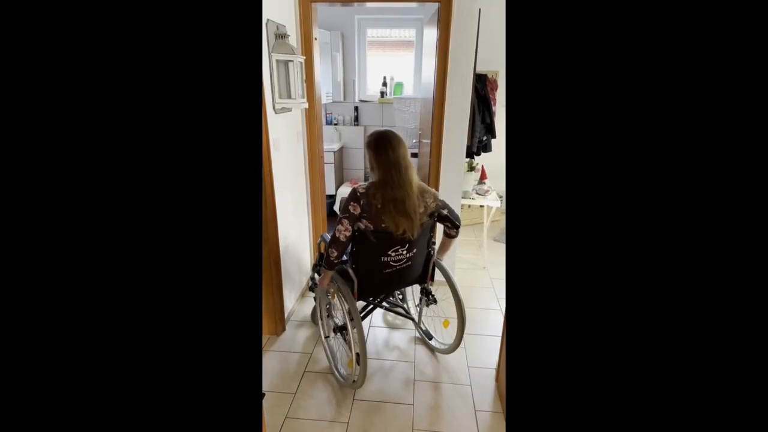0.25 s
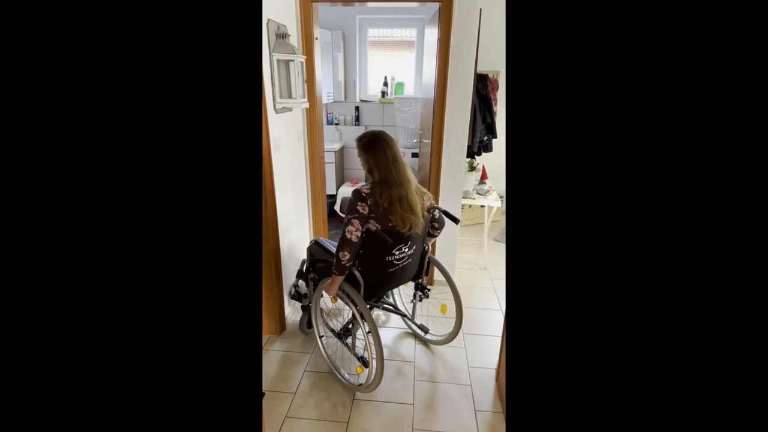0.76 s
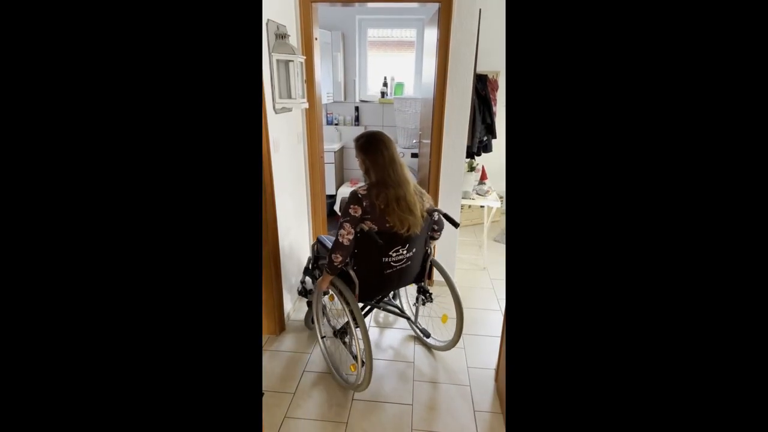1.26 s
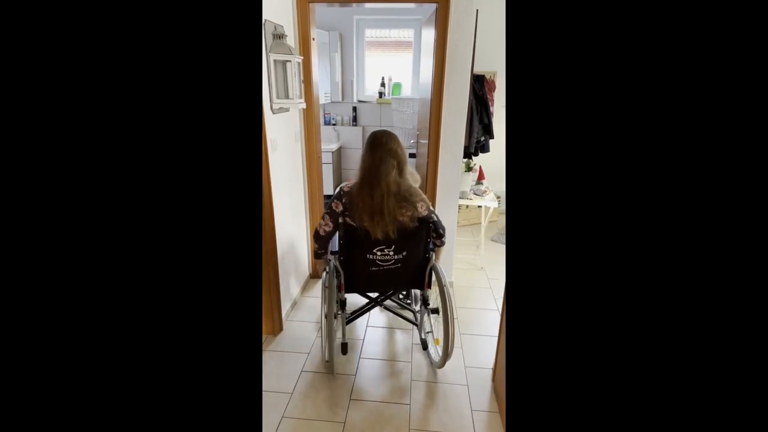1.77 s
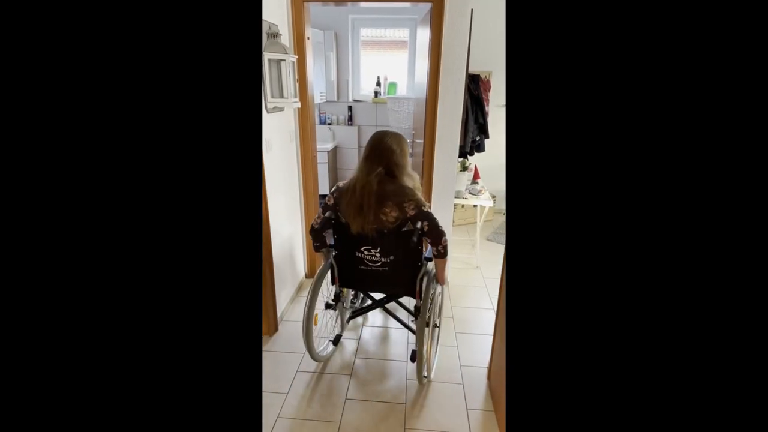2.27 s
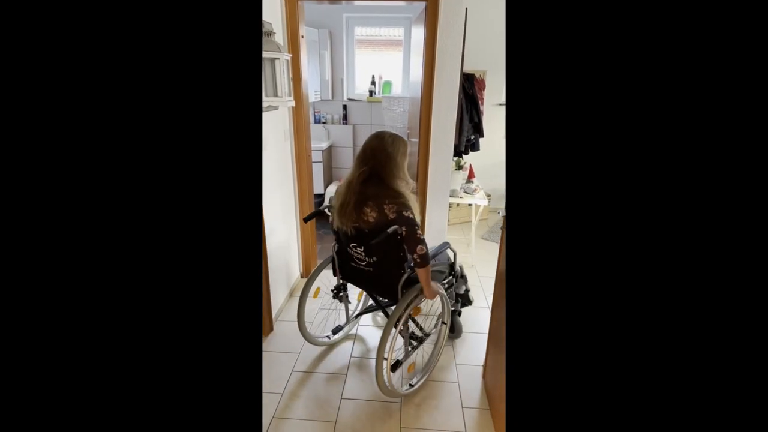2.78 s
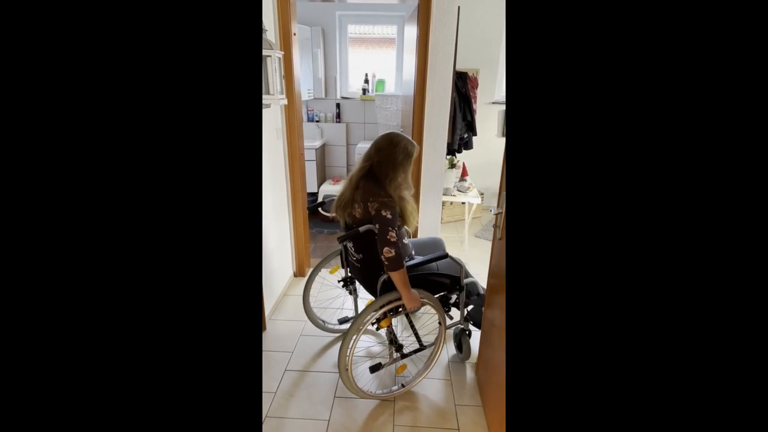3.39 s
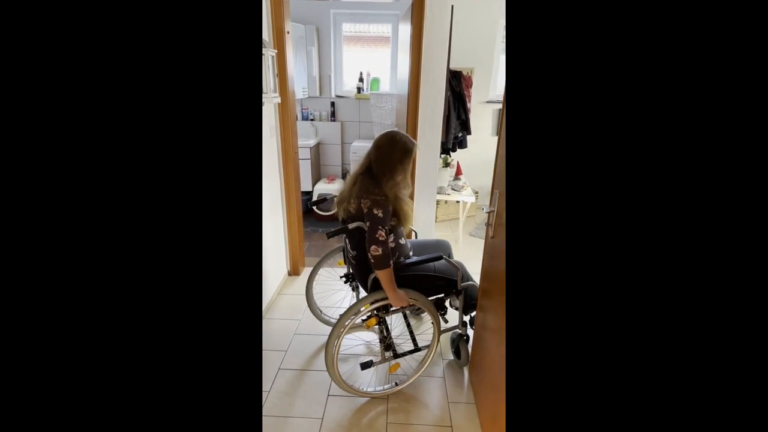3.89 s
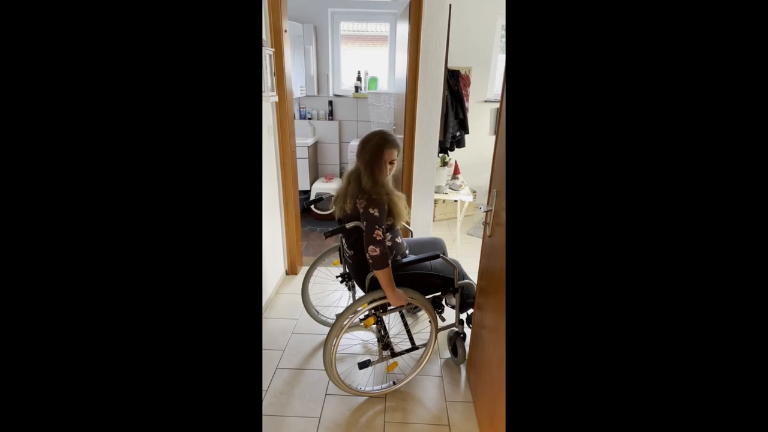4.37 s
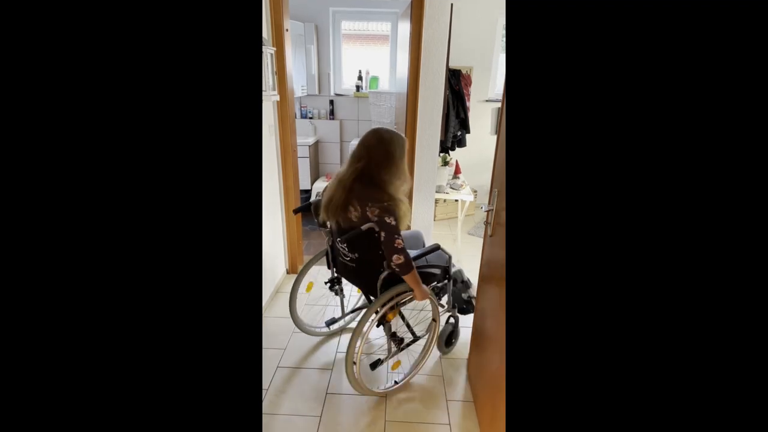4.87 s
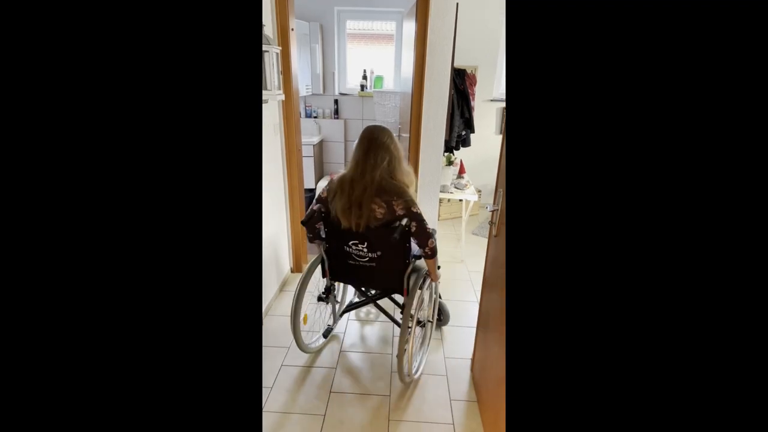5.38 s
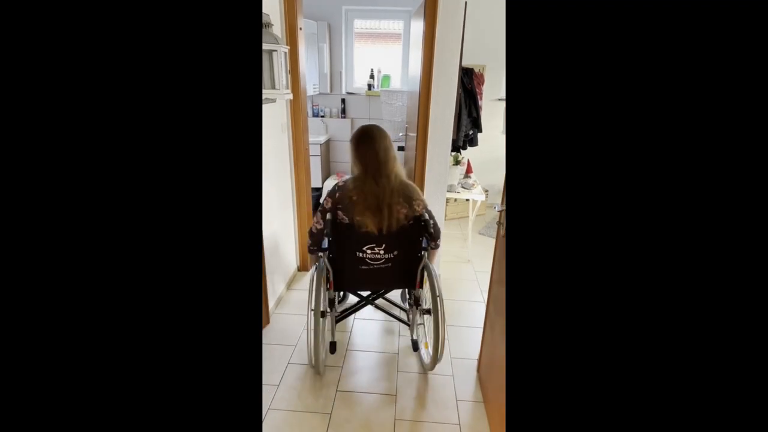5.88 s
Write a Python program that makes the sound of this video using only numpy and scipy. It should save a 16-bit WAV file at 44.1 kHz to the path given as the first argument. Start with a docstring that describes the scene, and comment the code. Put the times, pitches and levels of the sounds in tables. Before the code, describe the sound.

A wheelchair turns on a tiled floor, its tyres scrubbing in short pushes with clicks, rattles and one dull knock against a door.

```python
"""In a narrow tiled doorway off a hard hallway, a wheelchair turns to and fro a few metres from a phone. Stick-
slip friction makes the tyres scrub in short pushes, squeak once and ring the frame and hand rims. Loose joints
click, a palm slides on a rim, and a footrest strikes the door and bounces. The floor rumbles under the rolling
weight and thuds at the tile joints. The hallway reverberates, and a phase spread between the stereo channels
widens the treble."""
import sys
import numpy as np
from scipy import signal
from scipy.fft import rfft, irfft
from scipy.io import wavfile
from scipy.ndimage import uniform_filter1d

SR = 44100
rng = np.random.default_rng(int(sys.argv[2]) if len(sys.argv) > 2 else 0)


def waveform_to_disk(signal):
    """Save audio, clipped to [-1, 1], as 16-bit WAV at the path in sys.argv[1]."""
    frames = np.transpose(np.atleast_2d(signal))
    scaled = np.clip(frames, -1, 1) * 32767
    samples = np.round(scaled).astype(np.int16)
    wavfile.write(sys.argv[1], SR, samples)


N = 270935

# Pushes on the wheels: start_s, hold_s, level_db, swell_db, fade_db_per_s,
# dull_share_db, hiss_share_db, frame_share_db, rim_share_db, thump_db
WHEEL_PUSHES = [(0.0, 0.043, -61, -4.5, 100, -4.5, -12.5, -14, -24, -83),
                (0.055, 0.069, -60, -4, 90, 3.5, -8, -20, -22, -61),
                (0.16, 0.06, -59, 9.5, 400, -17, -7.5, -13, -23, -75),
                (0.22, 0.024, -47.5, -3.5, 183, 2.5, -11.5, -12, -15, -52.5),
                (0.344, 0.11, -74, -3, 150, 1.5, -9, -22, -8, -77),
                (0.617, .02, -50.5, -9, 200, -15, -9, -15, -19, -80),
                (0.657, 0.065, -47.5, 2.5, 300, -8.5, -8, -4, -8, -56),
                (0.723, 0.017, -49.5, -1.5, 106, -4, -12, -6, -18, -60),
                (0.859, 0.036, -49.5, 6.5, 200, -18, -6.5, -6.5, -11, -80),
                (0.925, 0.045, -46, 3, 217, -18, -10, -0.5, -18, -74.5),
                (1.092, 0.12, -43.5, 1, 200, -13, -12.5, -5, -23, -66.5),
                (1.215, 0.051, -42, -1, 159, -13.5, -8.5, -4, -32, -71),
                (1.375, 0.091, -61.5, -4.5, 150, 0, -10.5, -10, -29, -65.5),
                (1.483, 0.041, -61, 10, 400, -14, -15, -6, -32, -75),
                (1.536, 0.1, -44.5, -3, 130, -9, -6.5, -5.5, -32, -54),
                (1.776, 0.094, -47, 7, 150, -11, -7.5, -5, -32, -58.5),
                (1.932, 0.029, -44.5, 0, 148, -9.5, -6.5, -5, -33, -54),
                (2.002, .01, -46, 0, 120, -5, -7.5, -9.5, -35, -65),
                (2.09, .02, -49.5, -3.5, 170, -4, -5, -7.5, -33, -61.5),
                (2.182, 0.031, -52.5, -2, 89, -2.5, -15, -30, -31, -57),
                (2.466, 0.078, -62, -1, 113, 0.5, -14, -32, -27, -58.5),
                (2.65, 0.098, -73.5, 6, 98, -15, -6.5, -28, -9, -85),
                (2.751, 0.065, -65.5, -8, 100, 8, -23, -27, -9, -64),
                (2.839, 0.016, -60.5, 3.5, 94, -1, -25, -29, -23, -65),
                (2.99, 0.087, -69.5, 4.5, 87, -5, -17, -16, -18, -64.5),
                (3.429, 0.087, -69.5, -1, 197, -5.5, -7.5, -17, -16, -71.5),
                (3.54, 0.014, -55, -8, 138, -0.5, -9.5, -31, -8, -64.5),
                (3.822, 0.015, -51, 2.5, 149, -2.5, -14, -25, -14, -76),
                (3.998, 0.0076, -69, -4.5, 254, 11.5, -30, -14, -17, -80),
                (4.423, 0.1, -50, -1, 197, -1, -10.5, -24, -12, -66),
                (4.511, 0.04, -46.5, -3.5, 105, -0.5, -10.5, -22, -6, -58.5),
                (4.608, 0.071, -48.5, -1, 130, -3, -8.5, -12, -8, -64),
                (4.817, 0.13, -67, 6.5, 150, -3, -10.5, -10, -17, -71.5),
                (4.985, 0.054, -58, 6, 128, -3.5, -6.5, -24, -6, -67.5),
                (5.134, 0.077, -46, -3, 181, -6, -14, -8.5, -18, -61.5),
                (5.397, 0.073, -49, 2, 120, -4, -7, -18, 0, -66.5),
                (5.499, 0.099, -52, -1, 200, 0.5, -16, -25, -14, -68),
                (5.234, 0.013, -50, -1.5, 248, -5, -8, -7, -18, -65),
                (5.613, 0.023, -47.5, -2.5, 170, 0, -16, -4.5, -26, -59.5),
                (5.708, 0.096, -58, 1, 150, -2.5, -19.5, -9, -27, -57),
                (5.796, .01, -51, 0.5, 94, -4.5, -10, -15, -26, -54),
                (5.977, .1, -47, 0, 290, -4.5, -10, -6.5, -35, -56.5)]
# Wheels dropping into the joints between tiles: start_s, level_db, pitch_hz
TILE_BUMPS = [(0.058, -45, 230), (0.22, -51, 267), (0.658, -35.5, 232.4), (1.369, -40.5, 92.4),
              (1.544, -39, 217.5), (2.199, -44.5, 341), (2.481, -50, 268), (3.323, -47, 95),
              (4.699, -40, 232), (5.567, -38, 171)]


def undb(db):
    """Decibels as an amplitude ratio."""
    return 10 ** (np.asarray(db) / 20)


def across(table):
    """Rows of (frequency_hz, value) interpolated to every spectral bin on a log axis."""
    hz, value = np.transpose(table)
    return np.interp(np.log(np.fft.rfftfreq(N, 1 / SR) + 1), np.log(hz + 1), value)


def coloured(x, spectrum):
    """Spectral shaping by rows of (frequency_hz, gain_db), rolled off beyond both ends; rms 1."""
    closed = [(spectrum[0][0] / 2, -70), *spectrum, (spectrum[-1][0] * 2, -70)]
    y = irfft(rfft(x) * undb(across(closed)), N)
    return y / np.std(y)


def curve(rows):
    """Rows of (time_s, value) interpolated to every sample."""
    return np.interp(np.arange(N) / SR, *np.transpose(rows))


def walk(rate_hz):
    """Slow random modulation: held levels smoothed twice, with a spread near 1."""
    k = int(SR / rate_hz)
    steps = np.repeat(rng.standard_normal(N // k + 1), k)
    return 1.32 * uniform_filter1d(uniform_filter1d(steps, k), k)[:N]


def ring(hz, t60, seconds):
    """Free vibration of one damped mode."""
    t = np.arange(int(seconds * SR)) / SR
    return np.sin(2 * np.pi * hz * t) * 1000. ** (-t / t60)


def add(out, start_s, sound):
    """Superpose a sound on out."""
    i = int(start_s * SR)
    out[i:i + len(sound)] += sound[:N - i]


def swells(start, hold, db, swell_db, fade_db_per_s, attack_s):
    """Incoherent addition: envelopes that rise, swell over a hold and fade are summed in power."""
    grid = np.arange(0, N + 32, 32)
    t = grid[:, None] / SR - start
    held = np.clip(t / np.maximum(hold, .001), 0, 1)
    after = np.maximum(t - hold, 0)
    gain = np.clip(1 + t / attack_s, 0, 1) * undb(db + swell_db * held - fade_db_per_s * after)
    return np.interp(np.arange(N), grid, np.sqrt(np.sum(gain ** 2, axis=1)))


def background():
    """Stationary noise: a faint hush, strongest in the bass."""
    # frequency_hz, gain_db
    spectrum = [(100, 8), (300, -4), (1000, -15.5), (3000, -18), (8000, -23), (12000, -62), (16000, -7.5)]
    return undb(-75) * coloured(rng.standard_normal(N), spectrum)


def floor():
    """Structure-borne sound: rolling weight shakes the floor, which thumps at each push and bump."""
    rolling = [(0, -61), (.2, -70), (.52, -62), (.61, -77), (.67, -56), (.85, -57), (1.04, -72.5),
               (1.32, -75), (1.39, -61), (1.55, -66), (1.95, -61.5), (2.18, -71), (2.42, -57.5), (2.8, -82),
               (2.86, -60), (3.27, -72.5), (3.33, -60.5), (3.4, -63), (3.58, -57), (3.8, -66.5),
               (4.25, -64), (4.35, -73), (4.51, -65), (4.8, -60.5), (5.03, -68), (5.43, -72), (5.6, -63.5),
               (6.05, -63), (6.14, -77)]  # strength of the rumble: time_s, level_db
    rumble_spectrum = [(32, -31.5), (42, 5.5), (52, -1.5), (62, 1.5), (85, -10), (115, -13)]  # deep floor vibration: frequency_hz, gain_db
    thump_spectrum = [(90, -4.5), (130, -6), (210, 1), (320, -5.5), (480, -10.5)]  # the floor's response to a jolt: frequency_hz, gain_db
    push_start, push_hold, *_, push_db = np.transpose(WHEEL_PUSHES)
    bump_start, bump_db, _ = np.transpose(TILE_BUMPS)
    start = np.r_[push_start, bump_start] + 0.011  # the thump peaks just after its cause
    hold = np.r_[push_hold, np.full(len(bump_start), 0.01)]
    db = np.r_[push_db, bump_db - 22]
    jolts = swells(start, hold, db, swell_db=0, fade_db_per_s=98.5, attack_s=0.022)
    rumble = undb(curve(rolling)) * coloured(rng.standard_normal(N), rumble_spectrum)
    thump = jolts * undb(0.5 * walk(33)) * coloured(rng.standard_normal(N), thump_spectrum)
    return rumble + thump


def bumps():
    """Impact excitation: at a tile joint, floor and tyre thud together in two damped modes."""
    out = np.zeros(N)
    for start, db, hz in TILE_BUMPS:
        add(out, start, undb(db) * (0.37 * ring(hz, 0.21, .3) + 0.15 * ring(1.8 * hz, 0.18, .3)))
    return out


def palm():
    """Sliding friction: skin on the metal rim gives a smooth, fine hiss."""
    slide = [(2.2, -80.5), (2.4, -64.5), (2.55, -68), (2.7, -93), (3.0, -69.5), (3.25, -76.5), (3.4, -88)]  # strength of the rubbing: time_s, level_db
    spectrum = [(8500, -8), (10300, -2.5), (11500, -5.5), (13500, -12), (15800, 3)]  # skin on metal: frequency_hz, gain_db
    return undb(curve(slide) + 0.75 * walk(12)) * coloured(rng.standard_normal(N), spectrum)


def door_knock():
    """Modal response: the struck door rings and rattles; a softer contact excites fewer high modes."""
    blows = [(3.824, -33, 1500), (3.838, -33.5, 896), (3.86, -34, 380), (3.9, -33, 150), (3.975, -32, 116)]  # the footrest lands, bounces and leans: start_s, level_db, cutoff_hz
    modes = [(55.1, -2.5, 0.46), (84.1, -9.5, 1.), (93.4, -3.5, 0.61), (131, -10, 0.13), (204.2, -2, 0.38),
             (262, 1.5, 0.26), (322, 6.5, 0.13), (468, -0.5, 0.12), (637, -18, 0.19), (752, -3, 0.15),
             (998, -18, 0.14), (1140, -27, .1), (1400, -25, .1)]  # resonances of the door leaf: frequency_hz, level_db, t60_s
    out = np.zeros(N)
    t = np.arange(SR // 2) / SR
    press = np.linspace(0, 1, SR // 200)  # the rubber buffer yields for 5 ms
    for start, db, cutoff_hz in blows:
        strikes = undb(2.5 * rng.standard_normal(len(modes)))
        leaf = sum(strike * undb(mode_db) / (1 + (hz / cutoff_hz) ** 2) * ring(hz, t60, .5)
                   for strike, (hz, mode_db, t60) in zip(strikes, modes))
        leaf[:len(press)] *= press
        band = signal.butter(2, [100, 100 + cutoff_hz], "band", fs=SR, output="sos")
        noise = signal.sosfilt(band, rng.standard_normal(len(t)))
        rattle = 0.53 * noise / np.std(noise) * 1000. ** (-t / 0.23)
        add(out, start, undb(db - 6.5) * (leaf + rattle))
    return out


def joint_clicks():
    """Impact transients: play in the joints, and once the rebounding footrest, gives a hollow ring, a bright
    ring and a sharp crack."""
    # Joints and bolts striking, plus the footrest's small rebound off the door at 4.0 s: start_s, level_db,
    # hollow_hz, bright_hz, bright_share_db
    impacts = [(0.058, -42, 528, 2380, -1), (0.22, -40, 1050, 2220, 2), (0.274, -35, 750, 1850, -3.5),
               (0.616, -49, 1450, 3150, -8), (0.657, -42, 660, 3460, -1), (0.707, -40, 1670, 3720, 12),
               (1.089, -47, 1090, 3380, 4), (1.209, -27, 1590, 1910, -5), (1.537, -35, 990, 3070, 0.5),
               (1.776, -58, 1000, 3580, -10), (1.813, -37, 1120, 3250, 4), (1.927, -43, 1100, 3210, 4),
               (1.999, -42, 990, 3640, -7), (2.087, -37, 436, 3630, -4), (2.18, -46, 1020, 1860, 4),
               (2.204, -41, 1060, 2330, 6), (2.473, -43, 450, 3280, -26), (2.53, -40, 1050, 2400, -9),
               (2.756, -35.5, 540, 1830, -27), (2.854, -38, 1180, 2190, 0), (3.206, -53, 477, 4120, -4),
               (3.436, -59, 940, 4350, 3), (3.515, -42.5, 730, 2050, -19), (3.538, -42, 1110, 1860, 1),
               (3.998, -49, 579, 2170, -19), (4.421, -51, 665, 5320, 7), (4.441, -33, 605, 2170, -3.5),
               (4.507, -19.5, 1174, 2220, -6.5), (4.519, -33.5, 1050, 2890, 9.5),
               (4.617, -38, 650, 2850, -11), (4.672, -32.5, 660, 3000, -3.5),
               (4.983, -45.5, 1510, 2230, -5), (5.134, -34, 820, 3350, -7), (5.207, -40.5, 885, 2880, 1),
               (5.398, -54, 910, 5840, -8), (5.614, -31.5, 760, 2100, 1.5), (5.729, -43.5, 1110, 1880, -2),
               (5.799, -42.5, 990, 1960, 0), (5.976, -40, 1060, 2260, -5), (6.128, -28.5, 444, 1940, -18)]
    out = np.zeros(N)
    length_s = .06
    t = np.arange(int(length_s * SR)) / SR
    for start, db, hollow_hz, bright_hz, bright_db in impacts:
        crack = 0.039 * rng.standard_normal(len(t)) * np.exp(-t / 0.0038)
        hollow = 0.44 * ring(hollow_hz, 0.032, length_s)
        bright = ring(bright_hz, 0.013, length_s) + .5 * ring(1.25 * bright_hz, 0.0059, length_s)
        add(out, start, undb(db) * (hollow + undb(bright_db) * bright + crack))
    return out


def tyre_squeak():
    """Periodic stick-slip: a harmonic chirp whose pitch sags as the rubber lets go."""
    catches = [(.862, .897, 940, 895, -48)]  # rubber catching: start_s, end_s, start_hz, end_hz, level_db
    harmonics = [(1, 0), (2, -4), (3, -8), (4, 2), (5, -2), (6, -2)]  # partials of the squeak: harmonic_number, level_db
    out = np.zeros(N)
    for start, end, start_hz, end_hz, db in catches:
        count = int((end - start) * SR)
        phase = 2 * np.pi * np.cumsum(np.linspace(start_hz, end_hz, count)) / SR
        tone = sum(undb(partial_db) * np.sin(k * phase) for k, partial_db in harmonics)
        add(out, start, undb(db) * np.hanning(count) ** .5 * tone)
    return out


def slips(spread_db):
    """Irregular stick-slip of rubber on glaze: dense grains of uneven, bounded size, in clusters."""
    size = np.minimum(rng.exponential(size=N), 3)
    drift_db = 0.56 * walk(25) + 0.77 * walk(100)
    return rng.standard_normal(N) * undb(spread_db * size + 2.0 * walk(300) + drift_db)


def tubes(grains, modes, upper_db=0, upper_hz=3400):
    """Forced resonance: slips drive the tube modes, each wavering in level on its own; rms 1."""
    y = 0
    for hz, width_hz, db in modes:
        peak = signal.iirpeak(hz, hz / width_hz / 2.3, SR)  # two stages narrow the peak, so each is wider
        resonance = signal.lfilter(*peak, signal.lfilter(*peak, grains))
        swell_db = 3.0 * walk(12) + (hz > upper_hz) * upper_db
        y = y + undb(db + swell_db) / np.sqrt(width_hz) * resonance
    return y / np.std(y)


def tyre_scrub():
    """Friction noise: tyres dragged sideways slip on the tiles and ring the frame and hand rims."""
    dull_spectrum = [(250, -16), (500, 3.5), (1000, 4.5), (1600, -0.5), (2400, -2.5)]  # low body of the scrub: frequency_hz, gain_db
    grit_spectrum = [(1200, -21.5), (2200, -1.5), (3300, -1), (4800, -5.5), (6400, -6), (8000, -15)]  # its gritty middle: frequency_hz, gain_db
    hiss_spectrum = [(5500, -32), (7400, 1), (8800, -2), (11000, -7.5), (12500, -14), (16000, -15)]  # its fine top: frequency_hz, gain_db
    frame_modes = [(926, 290, -10), (1580, 60, -13), (2080, 50, -7), (2240, 60, -9), (3020, 60, -7),
                   (3230, 100, 1), (3620, 90, 1), (3780, 60, -5), (4330, 60, -13)]  # frame tube resonances: frequency_hz, nominal_width_hz, level_db
    rim_modes = [(1350, 200, -6), (5400, 330, 0), (5750, 300, -1)]  # hand rim resonances: frequency_hz, nominal_width_hz, level_db
    frame_brightness = [(0, -2), (.65, 2), (1.3, -0.5), (1.55, -9), (1.75, -9), (1.87, -3), (2.0, 5),
                        (2.15, 6.5), (2.4, -1), (4.5, -5), (5.15, -13), (5.9, -3.5), (6.14, 0)]  # upper frame modes against the lower: time_s, gain_db
    start, hold, db, swell_db, fade, dull_db, hiss_db, frame_db, rim_db, _ = np.transpose(WHEEL_PUSHES)
    attack_s, bite_decay_s = 0.006, 0.014

    def envelope(share_db, fade_ratio, sag_db_per_s=0):
        """One layer's gain through all the pushes."""
        rise_db = swell_db - sag_db_per_s * hold
        return swells(start, hold, db + share_db, rise_db, fade_ratio * fade, attack_s)

    grains = slips(spread_db=4.5)
    grit = envelope(-2.6, fade_ratio=1) * coloured(grains, grit_spectrum)
    frame = envelope(frame_db, fade_ratio=1.47) * tubes(grains, frame_modes, curve(frame_brightness))
    rims = envelope(rim_db, fade_ratio=4.2, sag_db_per_s=63) * tubes(grains, rim_modes)
    dull = envelope(dull_db, fade_ratio=0.89) * coloured(slips(spread_db=2.0), dull_spectrum)
    # extra hiss as the rubber first grips
    bite = swells(start, 0, db + hiss_db + 4, 0, 8.7 / bite_decay_s, attack_s)
    hiss = undb(3.5) * np.hypot(envelope(hiss_db, fade_ratio=1.49), bite) * coloured(grains, hiss_spectrum)
    return grit + frame + rims + dull + hiss


def hallway(x):
    """Diffuse reverberation: convolution with a noise tail whose octaves decay at their own rates."""
    decay_times = [(200, 0.55), (1000, 0.32), (4000, 0.35), (10000, 0.35)]  # reverberation time: frequency_hz, t60_s
    hz, t60 = np.transpose(decay_times)
    t = np.arange(int(.8 * SR)) / SR
    tail = 0
    for centre in 125 * 2. ** np.arange(8):
        edges = [centre / np.sqrt(2), min(centre * np.sqrt(2), .45 * SR)]
        octave = signal.butter(2, edges, "band", fs=SR, output="sos")
        decay = 1000. ** (-t / np.interp(np.log(centre), np.log(hz), t60))
        tail = tail + signal.sosfilt(octave, rng.standard_normal(len(t))) * decay
    tail *= np.clip(t / 0.0055, 0, 1)  # the nearest walls answer a few ms late
    return signal.fftconvolve(x, tail / np.sqrt(np.sum(tail ** 2)))[:N]


def scene():
    """Partial coherence: both channels share the direct sound, but only part of the reverberation."""
    unshared = [(60, 0.11), (300, 0.75), (700, 1.16), (1700, 0.37), (2900, 1.36), (4800, 0.82), (7500, 0),
                (9500, 0), (11000, .05), (12800, .9), (14200, 0), (15700, 0.6)]  # reverberation in antiphase: frequency_hz, amplitude_ratio
    friction = tyre_scrub() + tyre_squeak() + palm()
    clicks = joint_clicks()
    blows = door_knock() + bumps()
    direct = friction + clicks + blows + floor() + background()
    send = undb(-9) * friction + undb(-5) * clicks + undb(-14.5) * blows
    shared = direct + hallway(send)
    apart = irfft(rfft(hallway(send)) * across(unshared), N)
    return np.array([shared + apart, shared - apart])


def record(dry):
    """Stereo phase spread: the channels drift apart in phase, more so in the treble, widening it; band edges
    are cut."""
    balance = [(60, 0.5), (110, 0.5), (200, 1.0), (380, 1.5), (700, 2.5), (1290, 2.0), (2380, -0.5),
               (4400, 0.5), (8120, 0.0), (15000, 0.0)]  # left channel over right: frequency_hz, gain_db
    phase_spread = [(200, -.05), (700, -.14), (1700, .05), (2750, .9), (3270, 1.1), (3800, .7), (4300, 1.),
                    (4850, 0), (5340, .44), (6370, 1.9), (7300, 3.), (8000, 3.25), (9470, 4.8),
                    (10500, 6.2), (11600, 6.4), (12570, 7.9), (13600, 9.3), (14700, 9.5), (15700, 10.3)]  # stereo phase spread, left minus right: frequency_hz, phase_rad
    half_difference = undb(across(balance) / 2) * np.exp(.5j * across(phase_spread))
    left = irfft(rfft(dry[0]) * half_difference, N)
    right = irfft(rfft(dry[1]) / half_difference, N)
    stereo = signal.sosfilt(signal.butter(4, 32, "high", fs=SR, output="sos"), [left, right])
    return signal.sosfilt(signal.ellip(10, .2, 80, 15800, fs=SR, output="sos"), stereo)


dry = scene()
out = record(dry)
waveform_to_disk(out)
```